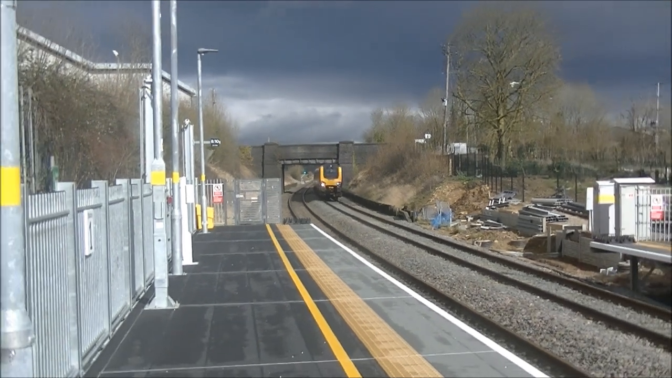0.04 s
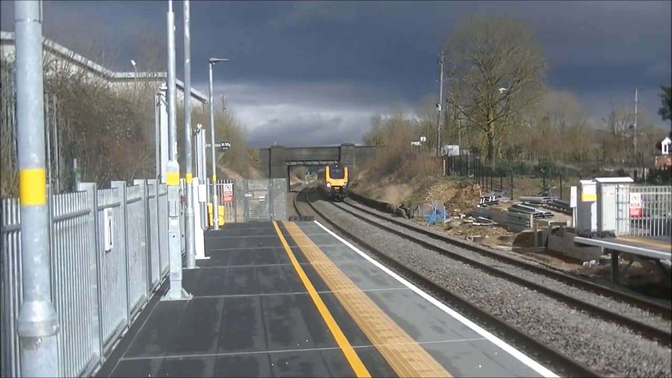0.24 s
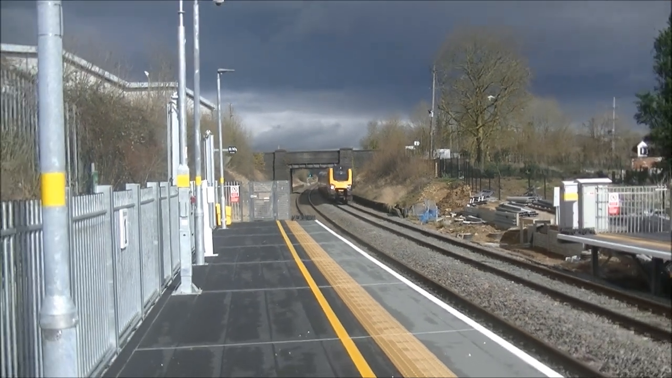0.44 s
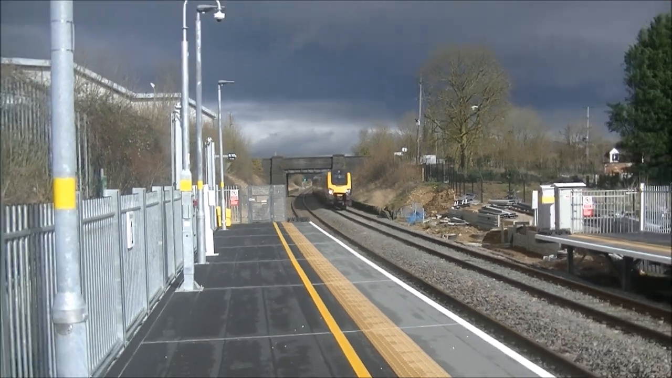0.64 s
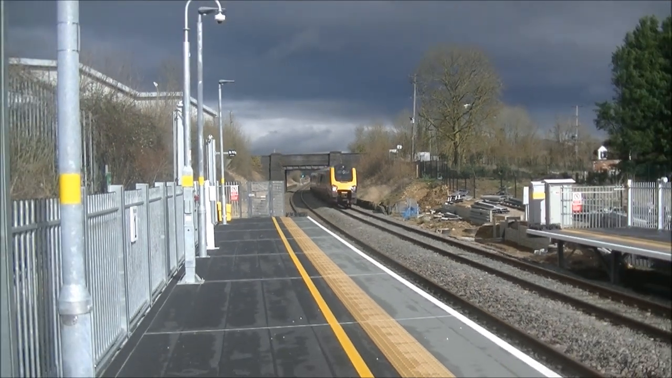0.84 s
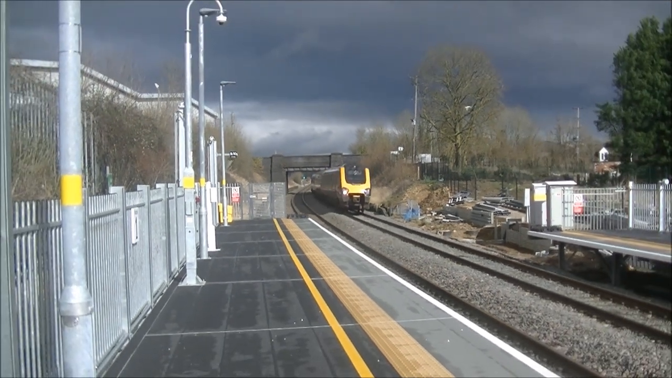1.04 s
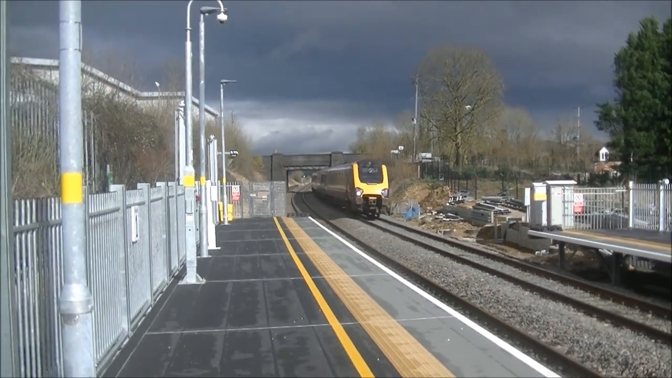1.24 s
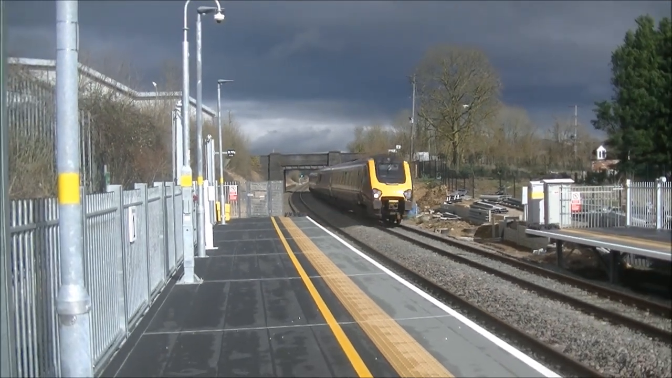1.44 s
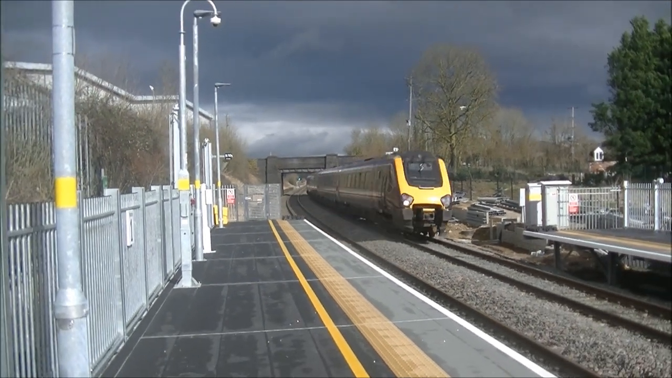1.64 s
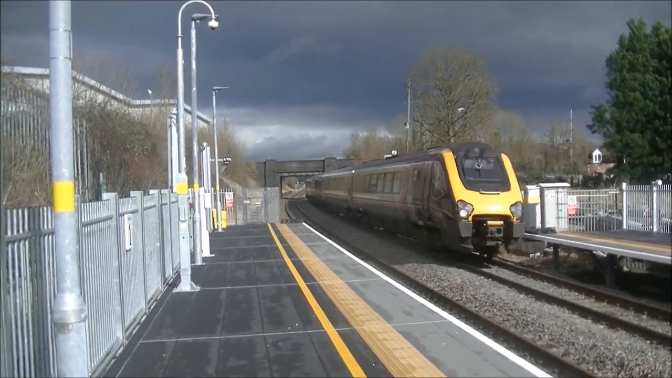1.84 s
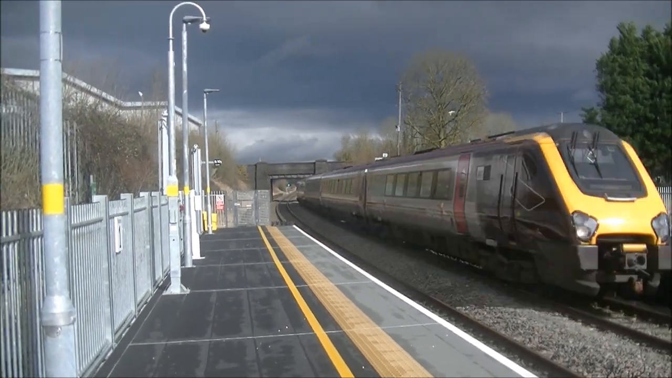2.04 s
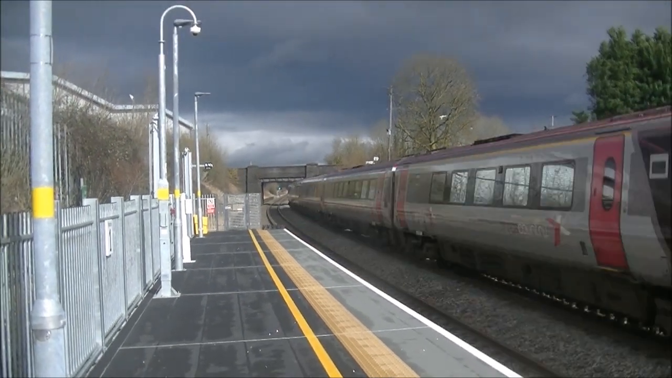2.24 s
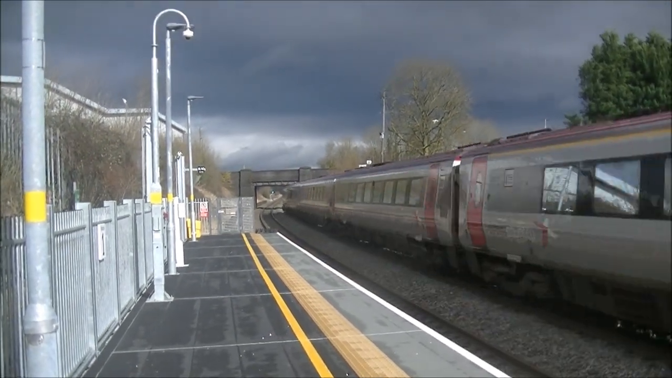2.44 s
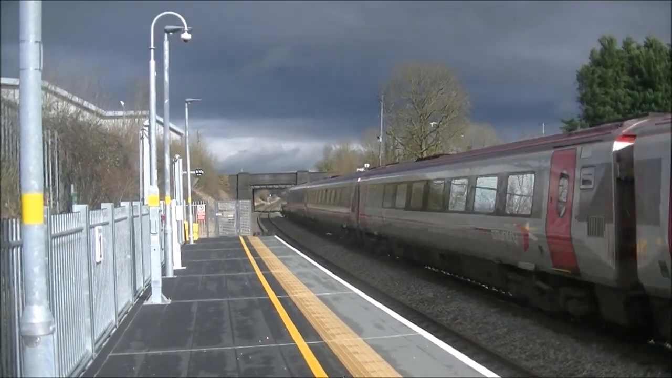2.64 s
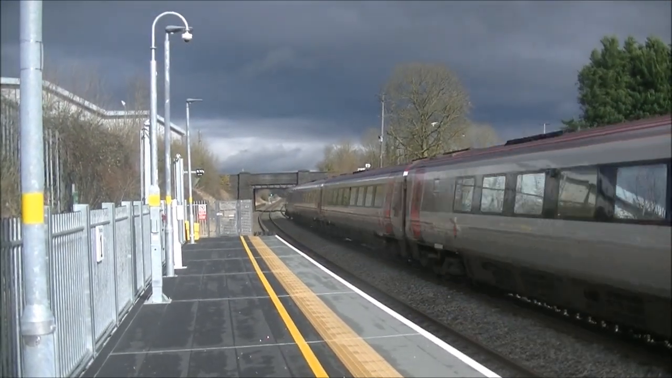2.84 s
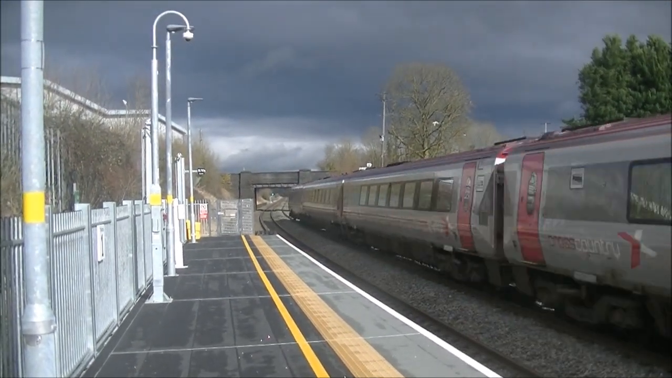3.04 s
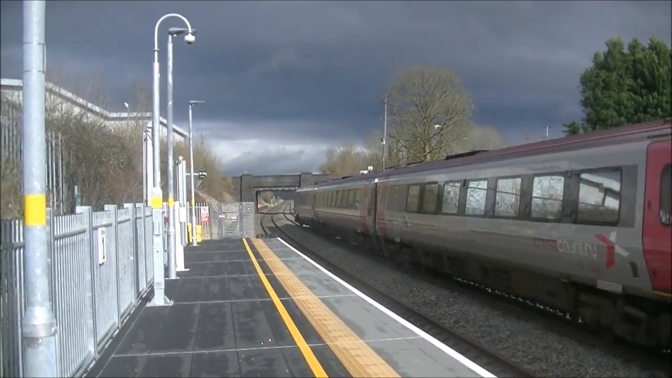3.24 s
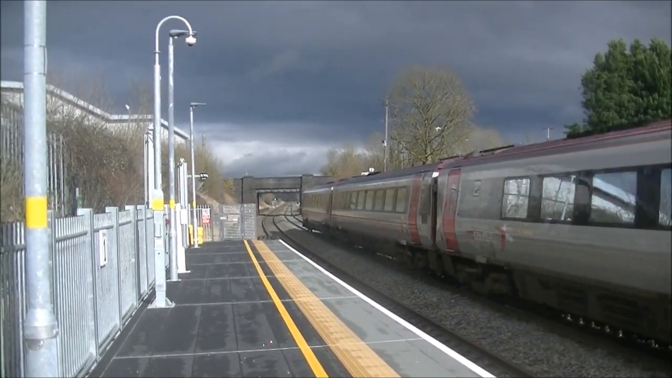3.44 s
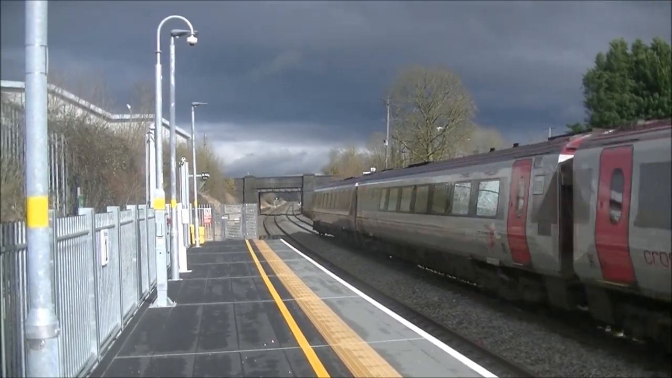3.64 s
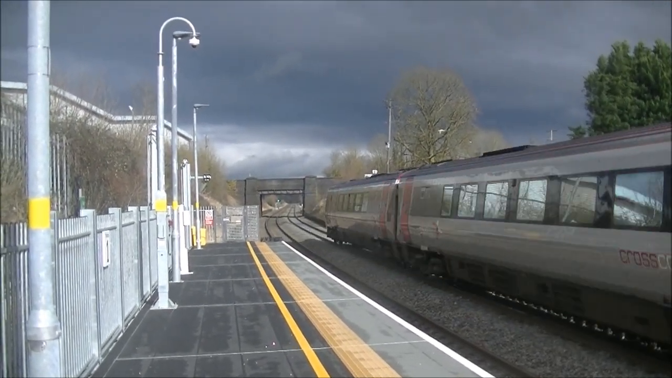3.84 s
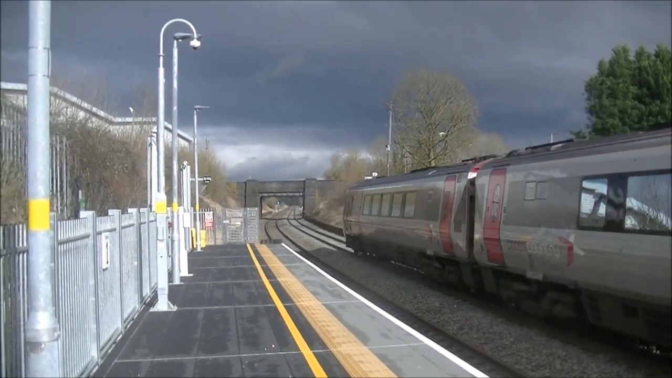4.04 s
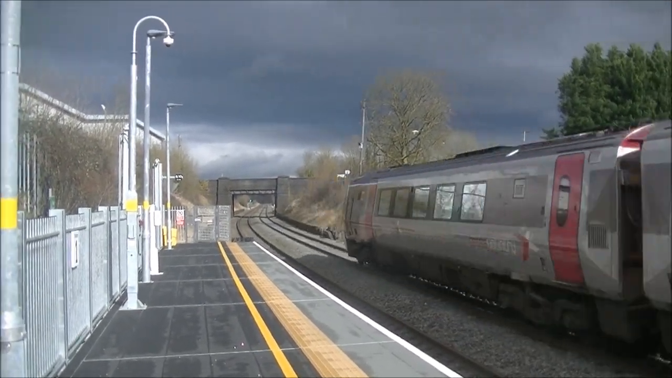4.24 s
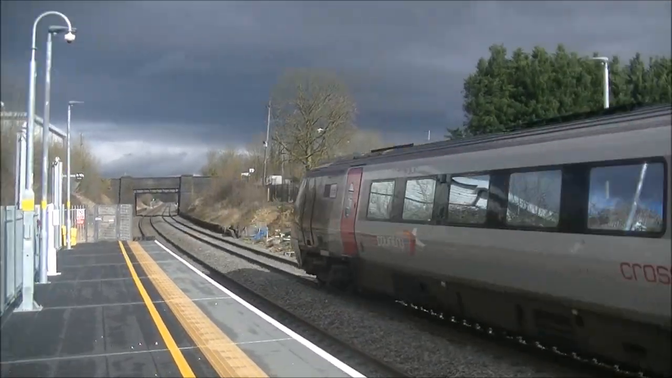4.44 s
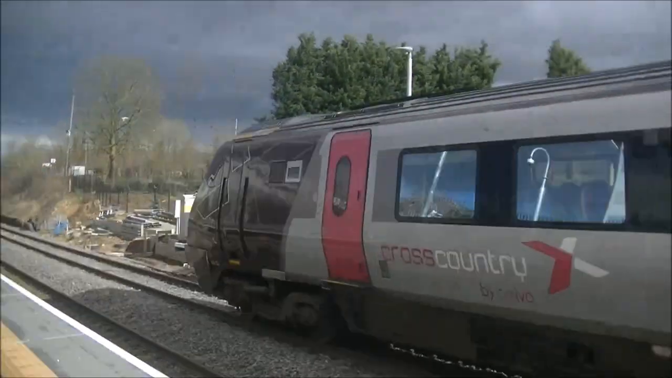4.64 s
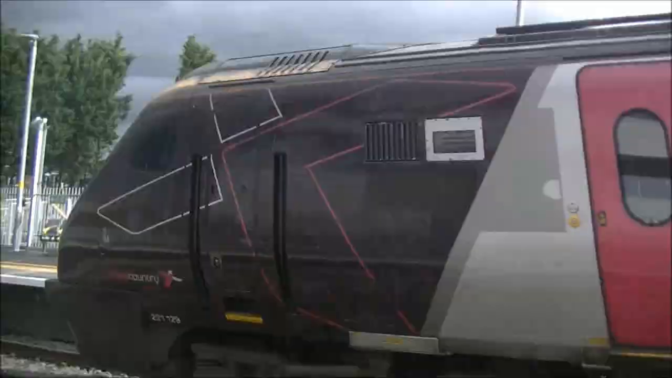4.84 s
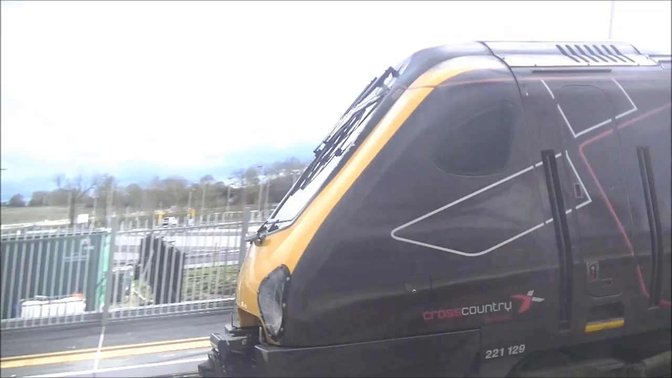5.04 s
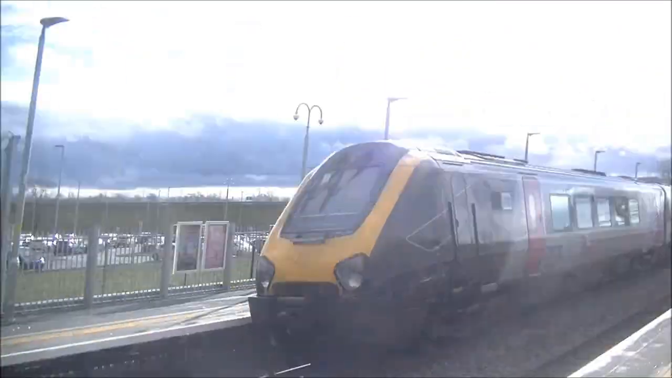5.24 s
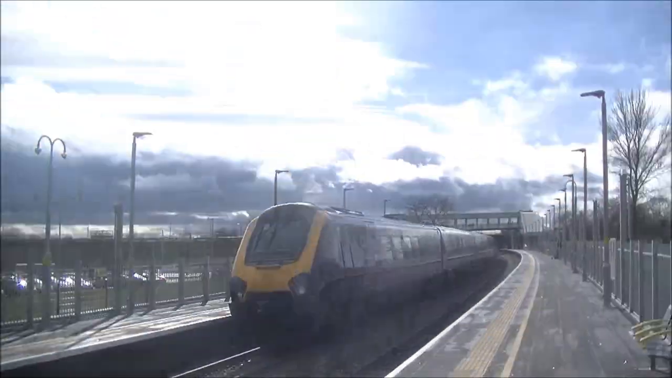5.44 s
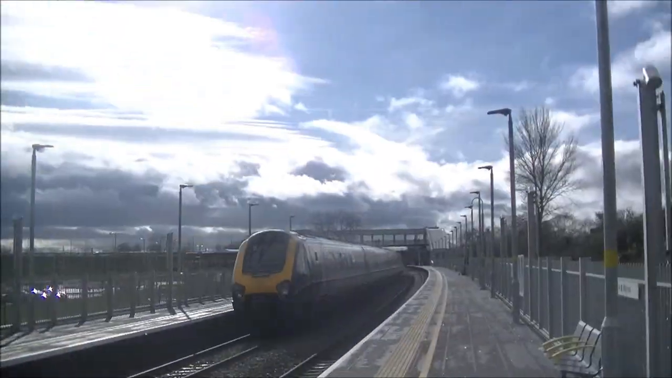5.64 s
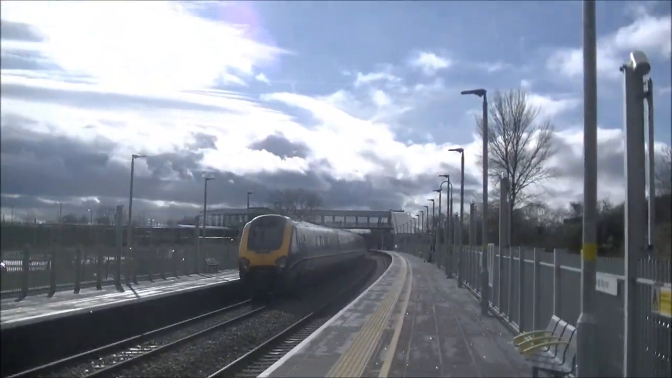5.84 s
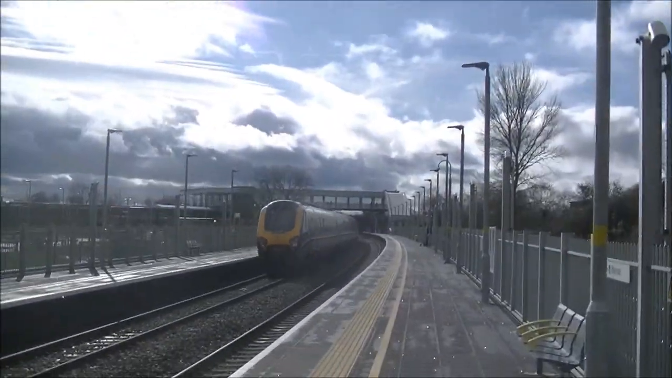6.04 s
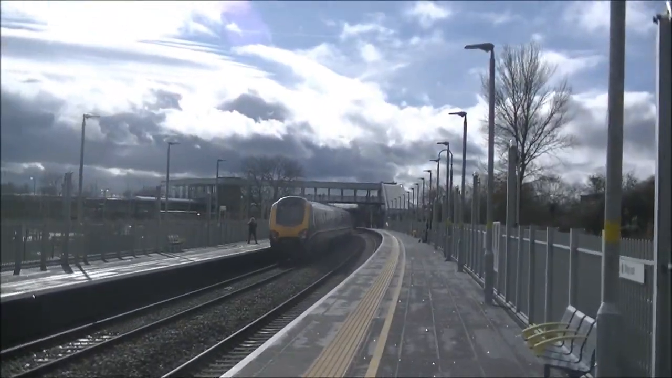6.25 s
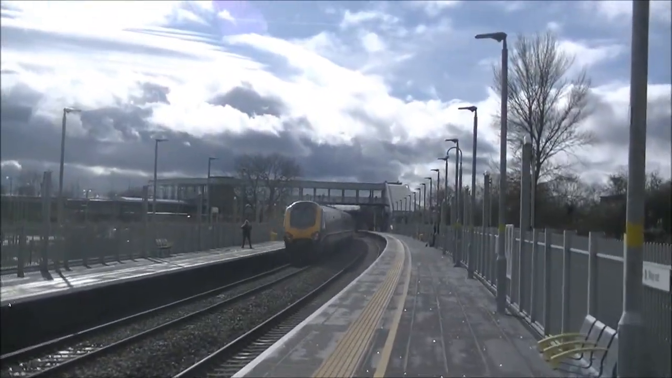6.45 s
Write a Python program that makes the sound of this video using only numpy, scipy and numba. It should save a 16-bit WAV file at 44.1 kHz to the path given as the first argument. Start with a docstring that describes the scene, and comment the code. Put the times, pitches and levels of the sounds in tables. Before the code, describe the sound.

A distant train makes the rails hum and whine faintly, growing steadily. A sharp little tick sounds close to the phone just before the train arrives. Five diesel cars rush past very near, a dense bright hiss and roar pulsing several times, with metallic wheel ring, falling whines and brief rapid clatter. Afterward it recedes fast, leaving wavering rail tones that die away over an open platform, slightly thin stereo sound.

```python
"""Station platform: a five-car diesel train runs past a phone at about 43 m/s.
The rail sings and hums ahead of and behind it in narrow bands of noise; brief tones and bursts swell.
Wheels and engines roar as shaped noise and surge; wheel groups ring and drop in pitch as they pass.
Wheels with a flat spot knock once a turn; something small clicks beside the phone as decaying modes.
The phone turns to follow the train: the left-right balance changes with the stage of the pass."""
import sys
import numpy as np
from scipy import signal
from scipy.io import wavfile
from scipy.ndimage import uniform_filter1d
from numba import njit

SR = 44100
rng = np.random.default_rng(int(sys.argv[2]) if len(sys.argv) > 2 else 0)


def transcribe(signal):
    """Save signal, clipped to [-1, 1], as a 16-bit WAV file at the path in sys.argv[1]."""
    frames = np.atleast_2d(signal).T
    limited = np.clip(frames, -1, 1)
    pcm = np.round(limited * 32767).astype(np.int16)
    wavfile.write(sys.argv[1], SR, pcm)


N = 287046
T = np.arange(N) / SR

NOSE_S, TAIL_S, CHANGE_S = 2.23, 5.324, 0.26  # ends of the train abreast; time constant of the blend
SPEED_M_PER_S, TRACK_M, SOUND_M_PER_S = 43, 5.5, 343

# wheel groups: abreast [t/s], relative ring [level/dB], pitch factor [1], roar surge [level/dB],
# treble surge [level/dB], track drone [f/Hz], track drone [level/dB]
WHEEL_GROUPS = [(2.4, -33, 1.18, 1.5, 3, 784, -53), (2.95, -29.5, 1.02, 4, 3.5, 765, -35.5),
                (3.47, -30, 1.04, 6.5, 3.5, 742, -28.5), (3.93, -31, 1.18, 3, 2.5, 739, -32.5),
                (4.55, -28, 1.01, 3, 3, 766, -34), (4.85, -30.5, 1.03, 0, 1.5, 704, -35),
                (5.1, -36, 0.85, 4, 4.5, 705, -55)]
# ringing modes of a wheel at pitch factor 1: centre [f/Hz], nominal width [f/Hz], relative [level/dB]
WHEEL_MODES = [(2039, 96, -2), (2205, 76, 1), (2373, 130, -3), (2762, 72.7, -6.5), (3590, 86.5, -16),
               (4120, 79, -23), (1501, 61, -6.5)]


def undb(db):
    """Amplitude factor of a level in dB."""
    return 10 ** (np.asarray(db) / 20)


def curve(table, hz):
    """A (f/Hz, value) table interpolated on a log-frequency axis."""
    f, v = np.transpose(table)
    return np.interp(np.log(hz + 1), np.log(f + 1), v)


def bump(t, t0, half_s):
    """Gaussian swell, 1 at t0 and 1/e at half_s to either side."""
    return np.exp(-((t - t0) / half_s) ** 2)


def stages(t):
    """Shares of coming, alongside and leaving; they sum to 1."""
    past_nose, past_tail = (.5 + .5 * np.tanh((t - s) / CHANGE_S) for s in (NOSE_S, TAIL_S))
    return 1 - past_nose, past_nose - past_tail, past_tail


def staged(values, t):
    """One value for each stage, blended in time."""
    return sum(v * w for v, w in zip(values, stages(t)))


def passing(abreast_s):
    """Doppler pitch factor and 1/r loudness (1 when abreast) of a point on the train."""
    along_m = SPEED_M_PER_S * (T - abreast_s)
    range_m = np.hypot(along_m, TRACK_M)
    receding_m_per_s = SPEED_M_PER_S * along_m / range_m
    return 1 / (1 + receding_m_per_s / SOUND_M_PER_S), TRACK_M / range_m


@njit
def svf(x, g, k):
    """State-variable band-pass, gain 1 at its moving centre; g sets the centre, k the relative width."""
    y, band, low = np.empty(len(x)), 0., 0.
    for i in range(len(x)):
        v = (band + g[i] * (x[i] - low)) / (1 + g[i] * (g[i] + k[i]))
        band, low = 2 * v - band, low + 2 * g[i] * v
        y[i] = k[i] * v
    return y


def ring(hz, width_hz):
    """Noise through two equal resonances in series, each width_hz wide; rms 1."""
    hz = np.minimum(hz * np.ones(N), .45 * SR)
    g, k = np.tan(np.pi * hz / SR), width_hz / hz
    once = svf(rng.standard_normal(N), g, k)
    y = svf(once, g, k)
    return y / y.std()


def walk(rate_hz):
    """Random levels held for 1 / rate_hz and slewed; standard deviation 1."""
    hold = int(SR / rate_hz)
    steps = np.repeat(rng.standard_normal(N // hold + 1), hold)[:N]
    w = uniform_filter1d(steps, hold)
    return w / w.std()


def warble(hz, width_hz):
    """Sine whose pitch (spread width_hz / 2) and level waver; rms near 1."""
    level = np.sqrt(2) * undb(1.6 * walk(25))
    cycles = np.cumsum(hz + width_hz / 2 * walk(40)) / SR
    return level * np.sin(2 * np.pi * cycles)


def rail_song():
    """Ripples on the rail head drive harmonic waves in the steel; the top partials carry furthest."""
    # partials: multiple [1], relative ahead of the train [level/dB], relative behind it [level/dB]
    partials = [(2, -4.5, -15), (3, -8, -5), (5, -17, -2), (6, -18, -8), (7, -16, -12), (8, -16, -19),
                (9, -10, -4), (10, -11, -11), (11, -10, -3), (12, -22, -4), (13, -15, -17), (14, -21, -11),
                (15, -19, -18), (16, -18, -11), (17, -19, -11), (18, -16, -16), (19, -25, -14),
                (20, -36, -13)]
    ahead_hz, behind_hz = 779, 724
    width_hz, spread = 30., .0005  # the width grows with the square of the multiple
    grow_db_per_s, fade_db_per_s, top_gain_db_per_s = 5.5, 11.5, 5
    coming, beside, leaving = stages(T)
    before_s, after_s = np.maximum(NOSE_S - T, 0), np.maximum(T - TAIL_S, 0)
    hz = staged((ahead_hz, (ahead_hz + behind_hz) / 2, behind_hz), T)
    db = staged((-48, -51, -42.5), T) - grow_db_per_s * before_s - fade_db_per_s * after_s
    top_db = staged((-8, -2, -7.5), T) + top_gain_db_per_s * (before_s + after_s)
    song = 0
    for k, ahead_db, behind_db in partials:
        share = undb(ahead_db) * (coming + beside / 2) + undb(behind_db) * (leaving + beside / 2)
        topness = np.clip(k / 10 - .5, 0, 1)  # 0 to multiple 5, 1 from 15
        gain = undb(db + top_db * topness + 2 * walk(5))
        song = song + share * gain * ring(k * hz, width_hz + spread * k * k * hz.mean())
    return song


def rail_hums():
    """Fixed rail resonances hum ahead of the nose and behind the tail, fading away from the train."""
    # resonances: centre [f/Hz], nominal width [f/Hz], before fading with time from that end [level/dB]
    ahead_modes = [(808, 28, -54.5), (970, 26, -51), (1067, 42, -47), (1205, 85, -46.5), (1604, 16.8, -51),
                   (6850, 790, -52.5), (8565, 55, -59)]
    behind_modes = [(926, 15, -43), (1030, 56, -43), (509, 22, -50.5), (3980, 460, -40.5), (8040, 130, -59)]
    grow_db_per_s, fade_db_per_s, waver_db, linger_s = 5.5, 8.5, 2, 0.15

    def hum(modes):
        return sum(undb(d + waver_db * walk(3.91)) * ring(f, w) for f, w, d in modes)

    ahead_gain = stages(T - linger_s)[0] * undb(-grow_db_per_s * np.maximum(NOSE_S - T, 0))
    behind_gain = stages(T)[2] * undb(-fade_db_per_s * np.maximum(T - TAIL_S, 0))
    return ahead_gain * hum(ahead_modes) + behind_gain * hum(behind_modes)


def roar():
    """Rolling and engine noise: level follows the angle the train fills; it surges, flickers and rings."""
    # colour in each stage, normalized later: [f/Hz], relative spectral density [level/dB]
    coming_colour = [(100, -17), (160, -12), (210, -4.5), (300, -21), (430, -2.5), (800, -5.5),
                     (1000, -2.5), (1400, -5), (2300, -4), (3000, -12), (3900, -9), (5500, -15.5),
                     (5900, -21), (7500, -20.5), (9600, -31.5), (12000, -32), (14800, -40), (15400, -46)]
    beside_colour = [(100, -16.5), (340, -10.5), (580, -6.5), (750, -2.5), (1340, -5), (2240, 0),
                     (2640, -5), (3740, -3.5), (4770, -11), (5400, -8), (8500, -15), (9500, -24.5),
                     (13000, -26.5), (15600, -34)]
    leaving_colour = [(100, -14.5), (400, -11.5), (520, -5.5), (900, -3), (1380, -4), (2130, 0),
                      (2780, -8.5), (3950, -9.5), (5600, -12.5), (6100, -18), (8200, -19), (9800, -30),
                      (14500, -32), (15600, -36)]
    # louder engines that lift the bass: abreast [t/s], lift [level/dB]
    engines = [(2.35, 5), (3.85, 2), (4.7, 0.5)]
    level_db, reach_m, soak_ahead_db_per_m = -25, 9.35, 0.08  # the ground soaks up more with distance
    surge_s, treble_surge_s, treble_lag_s, engine_s = 0.25, 0.16, 0.009, 0.23
    surge_bass_share = 0.39
    hz, t, z = signal.stft(rng.standard_normal(N), SR, nperseg=1024)

    colours = (coming_colour, beside_colour, leaving_colour)
    db = sum(np.outer(curve(c, hz), w) for c, w in zip(colours, stages(t)))
    core = (hz > 1200) & (hz < 6000)
    db -= 10 * np.log10(np.sum(undb(db[core]) ** 2, axis=0) / len(hz))  # equal core power at all times

    nose_m, tail_m = SPEED_M_PER_S * (t - NOSE_S), SPEED_M_PER_S * (t - TAIL_S)
    angle = np.arctan(nose_m / reach_m) - np.arctan(tail_m / reach_m)
    db += level_db + 10 * np.log10(angle / np.pi) - soak_ahead_db_per_m * np.maximum(-nose_m, 0)

    octave = np.log2((hz + 1) / 2500)
    bass, treble = np.clip(-octave / 2, 0, 1), np.clip(octave / 2, 0, 1)
    surge_db = sum(d * bump(t, t0, surge_s) for t0, _, _, d, *_ in WHEEL_GROUPS)
    treble_surge_db = sum(d * bump(t, t0 + treble_lag_s, treble_surge_s)
                          for t0, _, _, _, d, *_ in WHEEL_GROUPS)
    engine_db = sum(d * bump(t, t0, engine_s) for t0, d in engines)
    bass_db = staged((0.5, 3, 0), t) + engine_db - (1 - surge_bass_share) * surge_db
    treble_db = staged((4.5, 0, 2), t) - surge_db + treble_surge_db
    db += surge_db + np.outer(bass, bass_db) + np.outer(treble, treble_db)

    def blotches(bins, frames):
        smooth = uniform_filter1d(rng.standard_normal(z.shape), size=bins, axis=0)
        smooth = uniform_filter1d(smooth, size=frames, axis=1)
        return smooth / smooth.std()

    flicker_db = 0.35 + 0.48 * np.clip(octave, 0, 2)
    db += flicker_db[:, None] * blotches(40, 5)
    # brief narrow resonances below 5 kHz
    db += np.outer(octave < 1, staged((0.6, 2, 1.3), t)) * blotches(4, 6)
    return signal.istft(z * undb(db), SR)[1][:N]


def brief_swells():
    """Rail resonances, a high whine and a short wide-band flutter swell: wavering tones or wider noise."""
    # top [t/s], half length to 1/e [t/s], centre [f/Hz], nominal width [f/Hz], before flutter [level/dB]
    swells = [(.4, .2, 975, 12, -53), (.95, .14, 978, 20, -46), (1.25, .25, 8565, 35, -58),
              (1.37, .15, 1590, 10, -47), (1.0, .25, 812, 16, -53), (1.7, .3, 1068, 18, -44),
              (.8, .5, 1068, 30, -54), (5.58, .13, 700, 14, -44), (6.2, .15, 700, 16, -49),
              (1.55, .13, 969, 12, -43), (1.9, .13, 972, 16, -43), (1.87, .05, 5470, 28, -43.5),
              (2.07, .22, 5458, 28, -46), (1.3, .25, 7740, 60, -56), (4.33, .06, 14300, 200, -55),
              (.65, .018, 1120, 350, -43), (2.3, .3, 1587, 30, -42), (6.04, .11, 2166, 10, -41),
              (5.4, .17, 7900, 800, -40), (5.285, .045, 925, 8, -34), (5.51, .05, 925, 8, -37),
              (5.75, .2, 924, 8, -46)]
    flutter_db, flutter_hz = 3.5, 40
    out = 0
    for t0, half_s, f, w, db in swells:
        carrier = warble(f, w) if w < 45 else ring(f, w)
        gain = undb(db + flutter_db * np.tanh(walk(flutter_hz)))
        out = out + gain * bump(T, t0, half_s) * carrier
    return out


def clicks():
    """A small hard object ticks and bounces: decaying modes, softened by a sub-millisecond contact."""
    # start [t/s], peak [level/dB], contact time constant [t/s]
    hits = [(1.4522, -10.5, .0002), (1.4645, -20, .0004), (1.4674, -22, .0003)]
    # modes: [f/Hz], relative [level/dB], decay by 60 dB [t/s]
    modes = [(1770, -12, .006), (2650, -4, .006), (3300, -4, .005), (3900, 0, .005), (4400, -5, .003),
             (5750, -4, .004), (7500, -20, .002), (130, -21, .07)]
    t = T[:SR // 10]
    tick = sum(undb(db) * np.sin(2 * np.pi * f * t) * 1000. ** (-t / t60) for f, db, t60 in modes)
    out = np.zeros(N)
    for s, db, contact_s in hits:
        hit = tick * (1 - np.exp(-t / contact_s))
        out[int(s * SR):][:len(t)] -= undb(db) * hit / np.abs(hit).max()
    return out


def wheels():
    """The two bogies at each coupling ring their modes, rough in level and Doppler-shifted."""
    bogie_gap_s = 0.131
    out = 0
    for t0, db, pitch, *_ in WHEEL_GROUPS:
        for offset_s in (-bogie_gap_s / 2, bogie_gap_s / 2):
            shift, near = passing(t0 + offset_s)
            modes = sum(undb(d) * ring(f * pitch * shift, 1. * w) for f, w, d in WHEEL_MODES)
            out = out + undb(db - 2.5 + 2 * walk(60)) * near ** 1.97 * modes
    return out


def whines():
    """Single wheels, gears and blowers whine past as Doppler-shifted narrow noise."""
    # abreast [t/s], unshifted centre [f/Hz], nominal width [f/Hz], abreast before wavering [level/dB]
    parts = [(2.57, 13100, 1000, -53), (2.62, 5440, 400, -43), (4.45, 13300, 1200, -56),
             (3.05, 6430, 250, -54), (4.55, 6930, 300, -51), (2.55, 2210, 60, -32.5),
             (2.97, 2110, 140, -31), (3.42, 2258, 70, -27), (3.47, 2835, 50, -30.5), (4.66, 2850, 60, -37),
             (4.97, 2200, 120, -32), (5.1, 2073, 70, -32), (5.22, 1950, 200, -32)]
    out = 0
    for t0, f, w, db in parts:
        shift, near = passing(t0)
        out = out + undb(db + 2.0 * walk(30)) * near ** 2 * ring(f * shift, 1. * w)
    return out


def track_drone():
    """The track drones in a narrow band just after each wheel group."""
    lag_s, half_s, width_hz = 0.11, 0.24, 64
    return sum(undb(d) * bump(T, t0 + lag_s, half_s) * ring(f, width_hz)
               for t0, *_, f, d in WHEEL_GROUPS)


def clatter():
    """A flat spot knocks once a turn, cracks and rings the wheel; Doppler shifts knock rate and pitch."""
    # one knock [t/s], wheel abreast [t/s], relative [level/dB], pitch factor [1]
    flats = [(3.438, 3.46, -15, 1.02), (4.636, 4.636, -19, 1.02), (5.067, 5.085, -13, .985)]
    turn_hz, knock_s, tilt_db_per_oct = 16.3, .008, 16  # a knock favours the high modes
    crack_db, crack_hz = -5, 3000.
    out = 0
    for t0, abreast_s, db, pitch in flats:
        shift, near = passing(abreast_s)
        turns = np.cumsum(turn_hz * shift) / SR
        since_s = (turns - turns[int(t0 * SR)]) % 1 / turn_hz
        knock = uniform_filter1d(np.exp(-since_s / knock_s), size=90)
        modes = 0
        for f, w, d in WHEEL_MODES[1:]:
            gain = undb(d + tilt_db_per_oct * np.log2(f / 2000))
            modes = modes + gain * warble(f * pitch * shift, w / 2)
        # the crack takes the knock envelope twice, so it is shorter
        crack = undb(crack_db) * knock * ring(crack_hz, crack_hz)
        out = out + undb(db) * near ** 2.8 * knock * (modes / modes.std() + crack)
    return out


def ports(x):
    """Two microphone ports: level lean and phase lead by frequency, plus a share that differs."""
    # left minus right in each stage: [f/Hz], difference [level/dB]
    lean_coming = [(60, 0.0), (110, 0.0), (200, -5.5), (380, -2.5), (700, 1), (1290, -1.5), (2380, -1.0),
                   (4400, 1), (8120, 0.5), (15000, -0.5)]
    lean_beside = [(60, -0.5), (110, -4), (200, -3.5), (380, -2), (700, 0.5), (1290, -3.5), (2380, -3.5),
                   (4400, 0.0), (8120, -0.5), (15000, 0.0)]
    lean_leaving = [(60, -3.5), (110, -2), (200, -5), (380, -3), (700, 3.5), (1290, 2.5), (2380, -1),
                    (4400, 1.5), (8120, 1.5), (15000, 1)]
    # left-right likeness: [f/Hz], likeness 0-1 [1]
    likeness = [(130, .85), (250, .99), (500, .98), (1000, .87), (2000, .88), (4000, .88), (8000, .95),
                (12000, .975)]
    # lead of left over right: [f/Hz], phase [rad]
    lead = [(0, 0.069), (520, 0.27), (950, -0.26), (3190, 0.28), (4480, 0.19), (4910, 0.6), (7410, -0.046),
            (9220, -0.045), (9730, 0.05), (15300, 0.0)]
    hz, t, z = signal.stft(x, SR, nperseg=1024)
    leans = (lean_coming, lean_beside, lean_leaving)
    lean_db = sum(np.outer(curve(c, hz), w) for c, w in zip(leans, stages(t)))
    like = np.clip(curve(likeness, hz), 0, 1)[:, None]
    random_phase = np.exp(2j * np.pi * rng.random(z.shape))
    scattered = z * random_phase * np.sqrt(2)  # overlapping frames add in power
    turn = undb(lean_db / 2) * np.exp(.5j * curve(lead, hz))[:, None]
    same, apart = np.sqrt((1 + like) / 2) * z, np.sqrt((1 - like) / 2) * scattered
    left, right = (same + apart) * turn, (same - apart) / turn
    return signal.istft(np.array([left, right]), SR)[1][:, :N]


def scene():
    """The train and its track through both ports, plus the clicks equally in both."""
    track = rail_song() + rail_hums() + brief_swells() + track_drone()
    train = roar() + wheels() + whines() + clatter()
    return ports(track + train) + clicks()


def record(dry):
    """The phone drops bass, adds air rumble that grows with the draught and faint hiss, cuts the top."""
    low_cut = signal.butter(3, 338, "high", fs=SR, output="sos")
    air_band = signal.butter(1, [30., 90.], "band", fs=SR, output="sos")
    hiss_band = signal.butter(2, 6500, "high", fs=SR, output="sos")
    top_cut = signal.ellip(14, .3, 60, 15680, fs=SR, output="sos")
    thin = signal.sosfilt(low_cut, dry)
    air = signal.sosfilt(air_band, rng.standard_normal(dry.shape))  # independent in each port
    air = air * undb(-60.5 + staged((0, 9.0, 3.4), T))
    hiss = undb(-60) * signal.sosfilt(hiss_band, rng.standard_normal(N))
    return signal.sosfilt(top_cut, thin + air + hiss)


dry = scene()
out = record(dry)
transcribe(out)
```